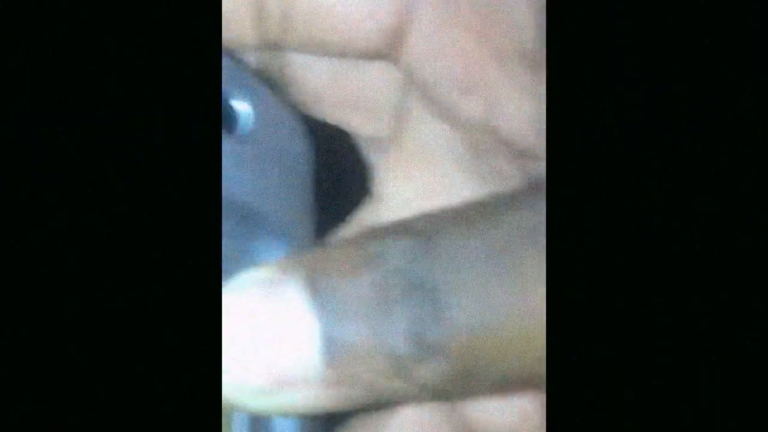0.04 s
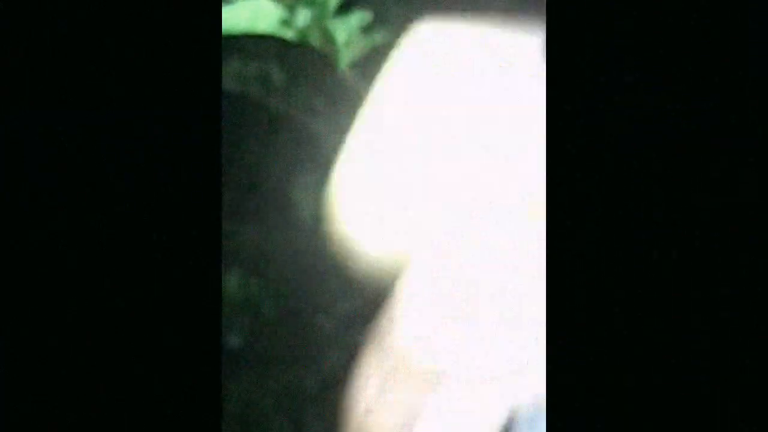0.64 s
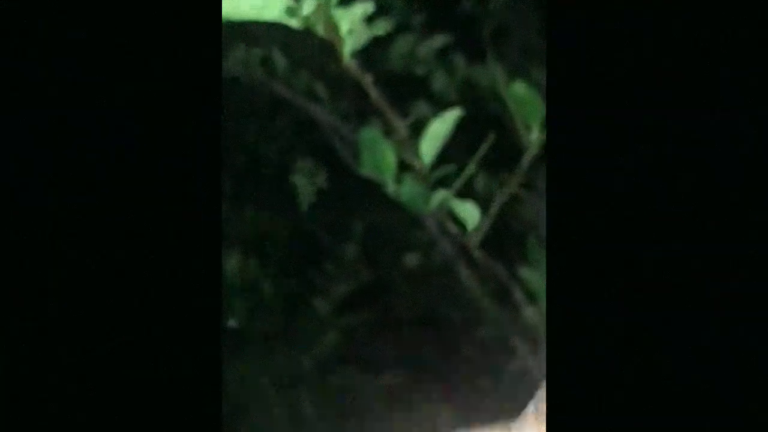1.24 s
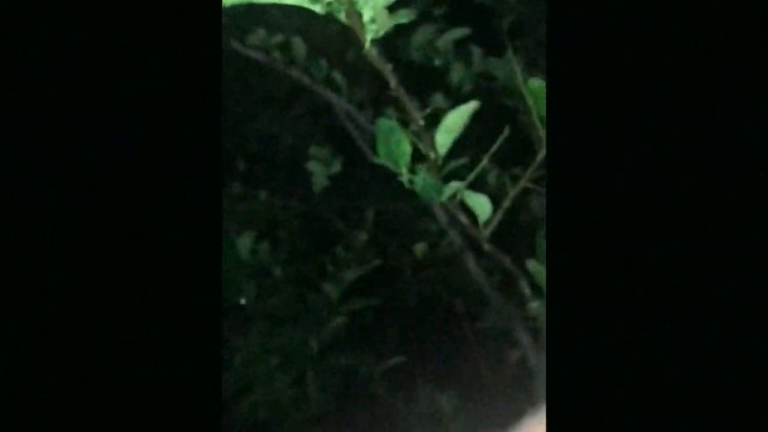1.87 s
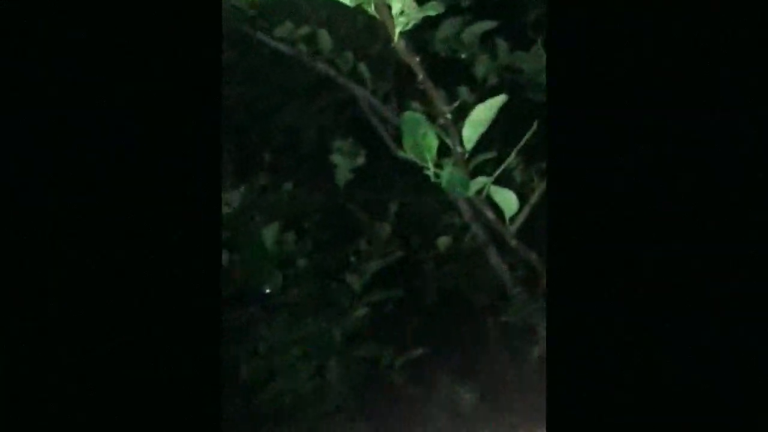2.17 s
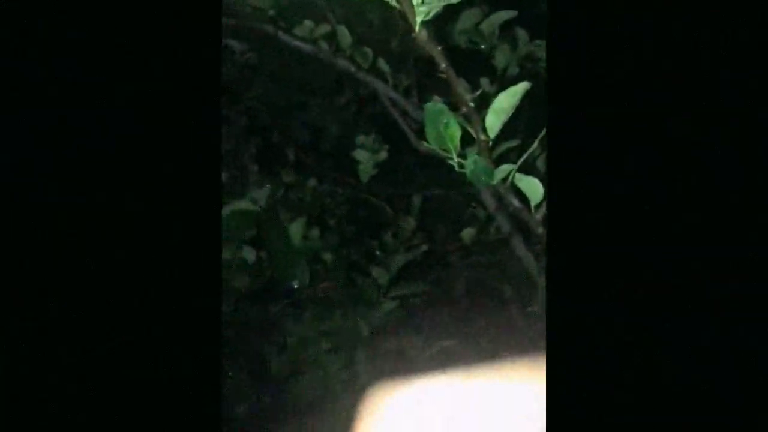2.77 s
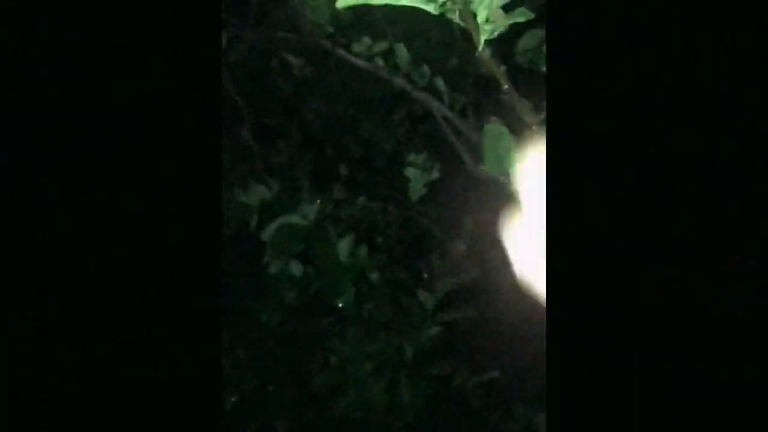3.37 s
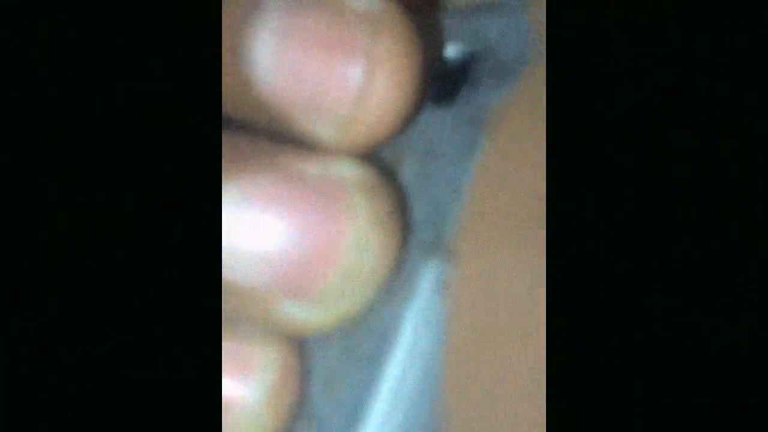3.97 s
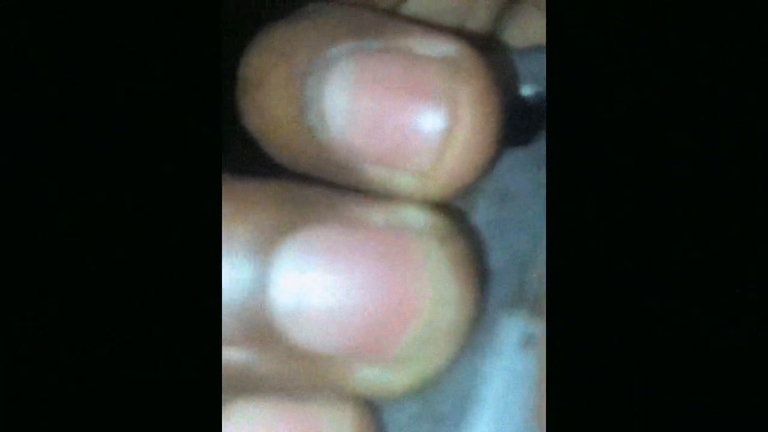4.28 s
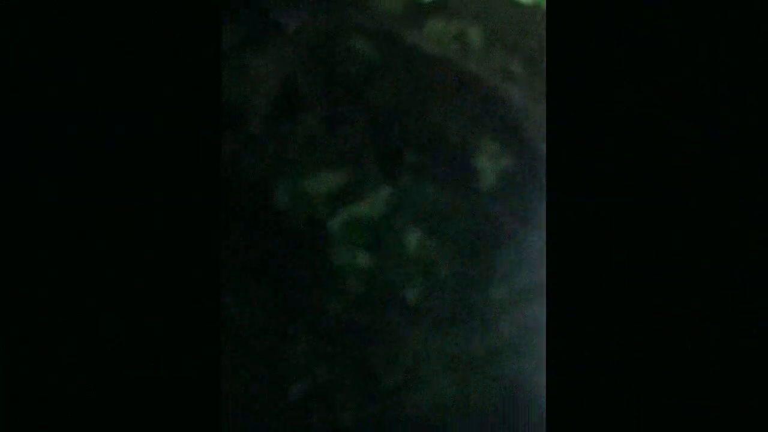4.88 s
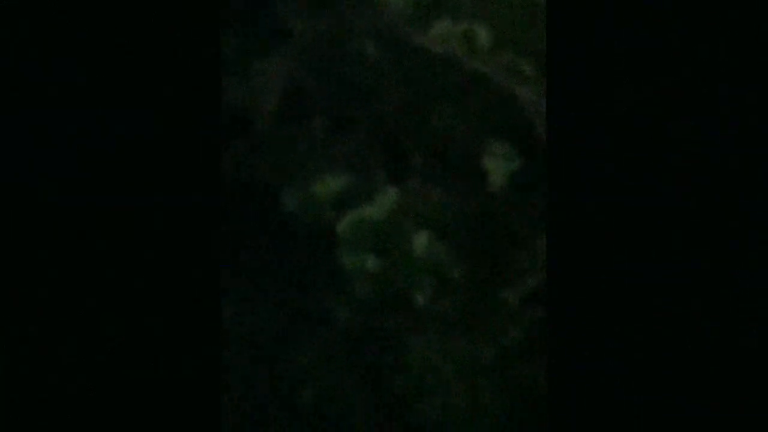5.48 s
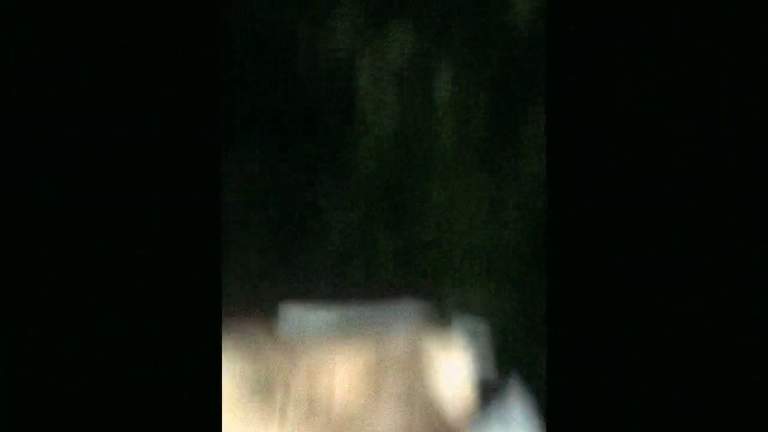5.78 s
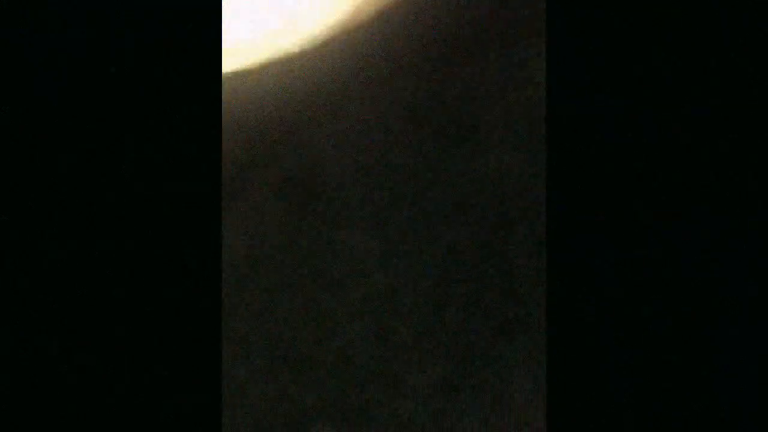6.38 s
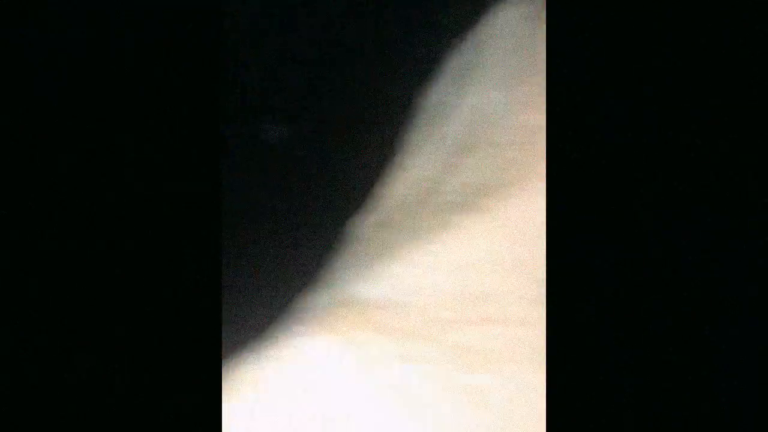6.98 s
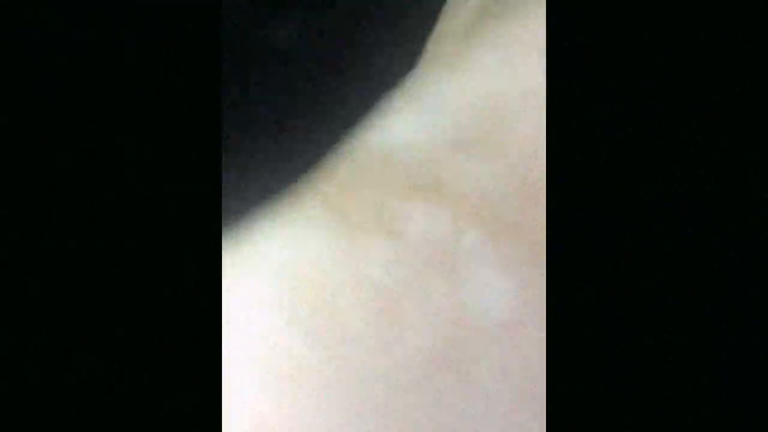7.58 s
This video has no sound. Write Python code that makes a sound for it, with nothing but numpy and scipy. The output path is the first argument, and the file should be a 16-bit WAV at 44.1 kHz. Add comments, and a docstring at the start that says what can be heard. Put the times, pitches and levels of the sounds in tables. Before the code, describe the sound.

Outdoors in bushes at night, a close cricket chirps high and fast, about seven chirps a second, resting briefly around 5 seconds and softening after 7. Behind it, all the way through, frogs call with short low peeps and higher, arching whistled trills, while far insects blend into a thin shimmer over faint night air.

Up front a hand shifts on a hollow plastic torch, with brief skin rubs and small creaks around 0.5 to 0.8, 1.3 and 1.9 seconds, and a louder cluster of creaks at 3.2. Light finger taps follow at about 4.3 and 4.5 seconds, with a few more later. The switch snaps sharply twice, at 5.6 and 6.1 seconds. The holding hand adds a faint low rumble and soft bumps on the microphone, mostly from 4 seconds on, with the strongest thump at 7.3. The chorus continues until the end, near 7.7 seconds.

```python
"""In the bushes at night, a close cricket chirps in falling wing strokes. Behind it two kinds of frog
call, in low peeps and higher arching trills, and far insects merge into a shimmer over the night air.
Up front a hand shifts its grip on a plastic torch: skin rubs and taps, the hollow case creaks,
the switch spring clicks twice, and the hand rumbles and bumps on the camera."""
import sys
import numpy as np
from scipy import signal
from scipy.fft import rfft, irfft, next_fast_len
from scipy.io import wavfile
from scipy.ndimage import map_coordinates

SR = 44100
rng = np.random.default_rng(int(sys.argv[2]) if len(sys.argv) > 2 else 0)


def digitize_waveform(pressure):
    """Quantize a signal to 16-bit integers and store it at the path in sys.argv[1].

    Rows of a 2-D input are taken as channels; values are limited to [-1, 1].
    """
    field = np.atleast_2d(pressure).T
    bounded = np.clip(field, -1, 1)
    quanta = np.round(bounded * 32767).astype(np.int16)
    wavfile.write(sys.argv[1], SR, quanta)


N = 340893

# Levels in the tables are relative; each layer adds its own trim.
# fader rides of the night bed: t/s, air level/dB, insect level/dB, hiss level/dB
BED_RIDES = [(0, -60.5, -59, -89), (1.5, -59, -57, -82), (2.7, -61, -58.5, -78), (4.2, -59.5, -60.5, -88),
             (5.1, -61, -61, -71), (5.9, -61.5, -57.5, -65.5), (6.7, -63, -58.5, -68),
             (7.73, -67.5, -58, -67.5)]
# tone colours of night air, far insects, far trills, far peeps and hiss: f/Hz, level/dB
AIR_EQ = [(15, -28), (35, -6.5), (60, 1.5), (100, -6.5), (200, -4.5), (400, -9), (650, -8.5), (1200, -19),
          (1700, -25.5), (2700, -25.5), (4500, -25.5), (10500, -41.5), (13000, -25.5), (15800, -35)]
INSECT_EQ = [(1200, -18.5), (1700, -22.5), (2700, -23.5), (3200, -19), (4200, -10.5), (4600, -12),
             (5050, -18.5), (5550, -6), (5850, -12), (6300, -3.5), (6650, 1.5), (7000, -0.5), (7300, -3),
             (7600, -18.5), (8200, -32.5)]
FAR_TRILL_EQ = [(2900, -40), (3300, -12.5), (3500, -4), (3720, -1), (3950, -1), (4100, -9), (4400, -34),
                (4800, -86)]
FAR_PEEP_EQ = [(1700, -42), (1860, -11.5), (1950, 0.5), (2060, 1.5), (2150, -6), (2300, -18), (2600, -51),
               (3000, -72)]
HISS_EQ = [(3000, -26), (10500, -7), (13000, 6), (15800, -3)]
# fader ride of the hand's rumble on the camera: t/s, level/dB
RUMBLE_RIDE = [(0, -68), (1.6, -85), (2.2, -60), (3.1, -77), (3.7, -61), (4.15, -57), (5.3, -56.5),
               (5.8, -75), (6.1, -58), (6.9, -54), (7.73, -54)]
# tone colour of that rumble: f/Hz, level/dB
RUMBLE_EQ = [(15, -48), (40, -13), (72, -4), (110, -9), (200, -14.5), (500, -23), (1000, -70)]
# soft bumps on the camera: t/s, f/Hz, peak level/dB, half-width/s
CAMERA_BUMPS = [(3.004, 132, -47, 0.0035), (4.18, 81.5, -45, 0.036), (5.162, 83, -42, 0.021),
                (5.512, 72, -39, 0.011), (6.985, 360, -40.5, 0.0052), (7.286, 55, -21.5, 0.0091)]
# bouts of the peeping frogs: first t/s, period/s, calls, final f/Hz, first level/dB, swell per call/dB
PEEP_BOUTS = [(.235, .925, 4, 2036, -49.5, -1.1), (.083, 1.275, 3, 2058, -52, 1.5),
              (.59, .9, 2, 2030, -52.5, -1), (3.48, .82, 3, 2030, -53, 0.6),
              (4.56, .835, 4, 2050, -52, -0.6), (.22, 1.035, 5, 1990, -52, -0.4),
              (4.02, 1.62, 3, 2020, -50.5, -2)]
# the close cricket's runs of evenly spaced chirps, some following straight on from the one before: first t/s,
# period/s, chirps
CRICKET_RUNS = [(.1422, .143, 5), (.8693, .1503, 4), (1.457, .1415, 3), (1.886, .1447, 4),
                (2.451, .1455, 4), (3.046, .146, 2), (3.3615, .1455, 4), (3.9605, .158, 3),
                (4.4275, .1425, 3), (5.3506, .1596, 4), (5.9797, .154, 3), (6.4656, .1486, 7),
                (7.526, .157, 2)]
# fader ride of the close cricket: t/s, level/dB
CRICKET_RIDE = [(0.15, -31.5), (.57, -34), (2.15, -34), (2.35, -31), (2.8, -34.5), (3.1, -33),
                (3.62, -35.5), (3.92, -29), (4.5, -35), (4.72, -30.5), (5.35, -34), (6.08, -31), (6.3, -37),
                (6.95, -33), (7.35, -41), (7.7, -39)]
# bouts of the trilling frogs: first t/s, period/s, calls, crest f/Hz, first level/dB, swell per call/dB
TRILL_BOUTS = [(.375, .915, 4, 3792, -44.5, -0.56), (4.55, .89, 4, 3800, -47, -0.95),
               (.12, 1.02, 2, 3742, -47.5, -5.5), (2.32, 1.04, 3, 3732, -46, -1.5),
               (4.62, 1.14, 3, 3738, -49, 2.5), (.7, .965, 4, 3900, -49.2, 0.76),
               (4.66, 1, 3, 3906, -49.5, 1.8), (.18, .98, 3, 3922, -44.5, -7.5),
               (4.13, 1.08, 2, 3910, -51, 3.5), (6.55, .8, 2, 3900, -41, -6.5),
               (.38, 1.09, 4, 4036, -50, -1), (4.9, 1.225, 3, 4038, -55.5, 1.5),
               (.53, .895, 6, 3545, -56.5, 1), (6.56, .81, 2, 3540, -44.5, -7.5),
               (5.32, .88, 3, 3712, -49.5, -.5), (1.6, .93, 2, 3900, -50.5, 0.5),
               (5.76, 1, 1, 3824, -47, 0), (6.04, 1, 1, 3636, -50, 0)]
# skin sliding over the torch: middle t/s, length/s, hiss level/dB, case level/dB
SKIN_RUBS = [(.262, .07, -53.5, -52), (.553, .09, -43, -45), (.692, .066, -56, -63), (.813, .1, -57, -54.5),
             (1.125, .035, -62, -57), (1.25, 1.07, -66, -68.5), (1.78, 0.076, -60, -56),
             (1.802, .024, -46, -65), (3.044, .041, -58, -64), (3.174, .035, -50, -34),
             (3.241, 0.094, -53.5, -51.5), (3.505, .09, -56.5, -62), (3.6, 0.64, -63.5, -65),
             (3.8, 0.073, -51.5, -56), (3.99, 0.063, -74, -53), (4.48, .1, -62, -58.5),
             (5.5, 0.061, -56, -62), (5.884, .052, -61, -77), (6.99, 0.12, -62.5, -64),
             (7.3, 0.36, -67.5, -69)]
# modes of the hollow torch case: f/Hz, bandwidth/Hz, level/dB
CASE_MODES = [(1412, 35, -3), (1535, 45, -1), (1602, 40, 0), (1662, 45, -1), (1780, 40, -2),
              (2330, 260, -13)]
# the grip slips and the case creaks: t/s, level/dB
GRIP_SLIPS = [(.545, -23.5), (.631, -30), (.788, -31), (.798, -34), (1.292, -31.5), (1.904, -34),
              (1.929, -28.5), (1.936, -31), (3.167, -16), (3.169, -13), (3.182, -14.5)]
# fingers tap the case: t/s, level/dB
FINGER_TAPS = [(3.002, -49), (4.337, -41.5), (4.522, -43), (5.641, -43.5), (5.857, -41), (5.942, -57),
               (7.338, -44.5)]
# tone colours of sliding skin and of a tap: f/Hz, level/dB
SKIN_EQ = [(200, -16), (900, -0.5), (2500, 9.5), (5500, 8.5), (8000, 11.5), (10500, 2.5), (13000, 6.5),
           (15300, 6.5), (16000, 14.5)]
TAP_EQ = [(150, -10), (500, -1), (1000, -5), (1400, 1), (2000, -16), (2900, -2.5), (5000, -13),
          (15000, -28.5)]
# cues of the nearest peeping frog, slowly quickening: t/s
NEAR_PEEP_CUES = [.423, 1.353, 2.273, 3.133, 4.013, 4.873, 5.663, 6.443, 7.263]
# clicks of the switch: t/s, snap level/dB, case level/dB
SWITCH_CLICKS = [(5.6255, -15, -24), (6.1328, -15, -27)]
# modes of the switch spring: f/Hz, level/dB, t60/s
SPRING_MODES = [(4470, 1.5, 0.0011), (9000, -11, 0.00057), (14300, -7, 0.0012)]


def amp(db):
    return 10 ** (np.asarray(db) / 20)


def unit(x):
    return x / np.sqrt(np.mean(x ** 2) + 1e-20)


def clock(length):
    """Sample times of a short sound."""
    return np.arange(int(length * SR)) / SR


def add(track, s, sound):
    """Mix a sound into the track from time s."""
    i = int(round(s * SR))
    part = sound[max(-i, 0):max(N - i, 0)]
    track[max(i, 0):max(i, 0) + len(part)] += part


def curves(rows):
    """One fader curve for each column after the time."""
    times, *columns = np.transpose(rows)
    return [np.interp(np.arange(N) / SR, times, column) for column in columns]


def wobble(rate, size=N):
    """A smooth random curve, rate knots a second."""
    return map_coordinates(rng.standard_normal(4096), [np.arange(size) * rate / SR], mode="wrap")


def filtered(x, response):
    """Filter x by a complex response of frequency."""
    size = next_fast_len(N + SR // 2)
    return irfft(rfft(x, size) * response(np.fft.rfftfreq(size, 1 / SR)), size)[:N]


def noise(eq):
    """Noise of rms 1 coloured by an EQ curve."""
    f, db = np.transpose(eq)
    white = rng.standard_normal(N)
    return unit(filtered(white, lambda hz: amp(np.interp(np.log(hz + 1), np.log(f), db))))


def phase_of(hz):
    """Running phase of a moving pitch, from a random start."""
    return 2 * np.pi * (np.cumsum(hz) / SR + rng.random())


def gate(t, length, attack, release):
    """Smooth fade in, hold and fade out."""
    fade_in = np.sin(np.pi / 2 * np.clip(t / attack, 0, 1)) ** 2
    fade_out = np.sin(np.pi / 2 * np.clip((length - t) / release, 0, 1)) ** 2
    return fade_in * fade_out


def beats(first, period, count):
    """Cues of an evenly repeated call."""
    return first + period * np.arange(round(count))


def foliage(sound, wet_db, t60):
    """Leaves and ground scatter each call along its own paths, leaving a short reverb tail."""
    t = clock(.3)
    tail = rng.standard_normal(len(t)) * amp(-60 * t / t60) * (t > .002)
    response = amp(wet_db) * tail / np.linalg.norm(tail)
    response[0] = 1  # the direct sound
    return signal.fftconvolve(sound, response)


def night_bed():
    """Distant frogs and insects merge into narrow bands over the night air and a faint hiss."""
    air_db, insect_db, hiss_db = curves(BED_RIDES)
    air = amp(air_db + 2.5) * noise(AIR_EQ)
    insects = amp(insect_db + 5 + 1.6 * wobble(70) + .93 * wobble(6)) * noise(INSECT_EQ)
    trills = amp(-55 + 1.5 * wobble(4)) * noise(FAR_TRILL_EQ)
    peeps = amp(-57 + 3.2 * wobble(8.2)) * noise(FAR_PEEP_EQ)
    hiss = amp(hiss_db - 1) * noise(HISS_EQ)
    return air + insects + trills + peeps + hiss


def hand_on_camera():
    """The holding hand rumbles and bumps the camera softly."""
    out = amp(curves(RUMBLE_RIDE)[0] + .5) * noise(RUMBLE_EQ)
    t = clock(.2) - .1
    for s, hz, db, half_width in CAMERA_BUMPS:
        envelope = np.exp(-np.abs(t / half_width) ** .87)
        add(out, s + t[0], amp(db) * envelope * np.cos(2 * np.pi * hz * t))
    return out


def far_crickets(count=62, length=.41):
    """Single far insects stand out of the shimmer as thin held tones, loudest where it is strongest."""
    out, t = np.zeros(N), clock(length)
    for s, hz in rng.uniform([-.3, 5150], [N / SR, 7350], (count, 2)):
        tone = np.sin(phase_of(hz + 14 * wobble(40, len(t)))) * gate(t, length, .1, .15)
        level_db = -60 + .55 * np.interp(hz, *np.transpose(INSECT_EQ))
        add(out, s, amp(level_db) * tone)
    return out


def peep(end_hz, length=.0905, fall_hz=56):
    """A frog's short whistle starts abruptly and sinks to its final pitch."""
    t = clock(length)
    progress = t / length
    pitch = end_hz + fall_hz * (1 - progress) ** 2
    envelope = gate(t, length, .008, .012) * amp(-2 * (progress - .5))
    flutter = 1 + .15 * wobble(200, len(t))
    return foliage(np.sqrt(2) * envelope * flutter * np.sin(phase_of(pitch)), wet_db=-13, t60=.25)


def frog_chorus(call, bouts, trim_db, stray_hz, crowd_hz, spread_hz, crowd_db, crowd_calls):
    """Nearer frogs keep their own pace, swelling or tiring; a farther crowd joins at random moments."""
    out = np.zeros(N)
    for first, period, calls, hz, db, swell_db in bouts:
        for k, s in enumerate(beats(first, period, calls)):
            add(out, s - .008, amp(trim_db + db + swell_db * k) * call(hz + stray_hz * rng.normal()))
    for k, (nudge, detune, accent) in enumerate(rng.uniform(-1, 1, (crowd_calls, 3))):
        s = (k + nudge) / crowd_calls * N / SR
        level_db = crowd_db + 2 * accent - 5 * detune ** 2
        add(out, s, amp(level_db) * call(crowd_hz + spread_hz * detune))
    return out


def wing_stroke(start_hz, fall_hz, length, fade_db, overtone_db=-39):
    """One wing closure: the scraper slows along the file, so the tone sinks and fades."""
    t = clock(length)
    progress = t / length
    phase = phase_of(start_hz + rng.normal(0, 34) - fall_hz * progress ** 1.72)
    envelope = gate(t, length, .0035, .002) * amp(-fade_db * progress ** 2)
    tone = np.sin(phase) + amp(overtone_db) * np.sin(2 * phase)
    return np.sqrt(2) * envelope / envelope.max() * tone


def close_cricket(trim_db=.74, lead_db=-14.5, middle_db=-2.5, scatter_db=.65):
    """Each chirp is a faint lead-in stroke and two full ones; the last falls on the beat."""
    out = np.zeros(N)
    for s in np.concatenate([beats(*run) for run in CRICKET_RUNS]):
        lead, middle, last = amp(rng.normal([lead_db, middle_db, 0], scatter_db))
        chirp = np.zeros(SR // 10)
        add(chirp, 0, lead * wing_stroke(start_hz=6255, fall_hz=388, length=.0073, fade_db=3))
        add(chirp, .0155, middle * wing_stroke(start_hz=6740, fall_hz=840, length=.01235, fade_db=16))
        add(chirp, .0365, last * wing_stroke(start_hz=6787, fall_hz=966, length=.014, fade_db=17.5))
        level_db = trim_db + np.interp(s, *np.transpose(CRICKET_RIDE))
        add(out, s - .042, amp(level_db) * foliage(chirp, wet_db=-10, t60=.082))
    return out


def trill(crest_hz, length=.169, throb_hz=145):
    """A frog's lightly throbbing whistle climbs, crests and sags; no two arches are alike."""
    t = clock(length)
    progress = t / length
    crest_at, bend = rng.uniform([.45, .7], [.72, 1.4])
    sag_hz = 135 * bend * (1.2 * (progress - crest_at)) ** 2
    pitch = crest_hz - sag_hz + 4 * wobble(35, len(t))
    pace = 1 + .15 * rng.normal() - .25 * progress  # the throb slows through the call
    throb = 1 + .2 * np.sin(phase_of(throb_hz * pace))
    envelope = gate(t, length, .012, .025) * amp(-10 * (progress - .6) ** 2)
    return foliage(np.sqrt(2) * envelope * throb * np.sin(phase_of(pitch)), wet_db=-11.5, t60=.3)


def finger_brushes(count=7, length=.058, hiss_db=-68, case_db=-68):
    """Faint touches of the fingers at random moments, as rows like those of SKIN_RUBS."""
    return [(s, length, hiss_db, case_db) for s in rng.random(count) * N / SR]


def case_ring():
    """Noise of rms 1 ringing in the modes of the hollow plastic case."""
    def response(f):
        return sum((-1) ** k * amp(db) * 1j * f * width / (hz * hz - f * f + 1j * f * width)
                   for k, (hz, width, db) in enumerate(CASE_MODES))
    return unit(filtered(rng.standard_normal(N), response))


def torch_handling(hiss_trim_db=5, case_trim_db=-1, creak_trim_db=2, tap_trim_db=1):
    """Sliding skin hisses and stirs the case; slips make it creak, fingertips tap it."""
    slide, case_drive, tap_drive, creaks = np.zeros((4, N))
    for s, length, hiss_db, case_db in list(SKIN_RUBS) + finger_brushes():
        swell = np.exp(-np.abs(2 * clock(2 * length) / length - 2) ** 3)
        add(slide, s - length, amp(hiss_db) * swell)
        add(case_drive, s - length, amp(case_db) * swell)
    t = clock(.05)
    creak_envelope = gate(t, .05, .0035, .01) * amp(-60 * t / .029)
    for s, db in GRIP_SLIPS:
        ring = sum(amp(mode_db) * np.sin(2 * np.pi * rng.normal(hz, width / 2) * (t - .002))
                   for hz, width, mode_db in CASE_MODES)
        add(creaks, s - .001, amp(db) * creak_envelope * ring / np.abs(ring).max())
        add(slide, s, amp(db - 17 - 60 * t / .0071))  # the skin tears free with a short rasp
    tap_envelope = gate(t, .05, .0014, .01) * amp(-60 * t / .083)
    for s, db in FINGER_TAPS:
        add(tap_drive, s - .001, amp(db) * tap_envelope)
    # ridges of skin catch and let go, so the friction comes in uneven grains
    grain = unit(amp(4 * wobble(900) + 2.7 * wobble(130)))
    hiss = amp(hiss_trim_db) * slide * noise(SKIN_EQ)
    case = amp(case_trim_db) * case_drive * case_ring()
    taps = amp(tap_trim_db) * tap_drive * noise(TAP_EQ)
    return grain * (hiss + case) + amp(creak_trim_db) * creaks + taps


def near_frog(end_hz=1928, stray_hz=6, start_db=-41, fade_db_per_s=.53):
    """The nearest peeper repeats one low note, slowly fading."""
    out = np.zeros(N)
    for s in NEAR_PEEP_CUES:
        add(out, s - .002, amp(start_db - fade_db_per_s * s) * peep(end_hz + stray_hz * rng.normal()))
    return out


def torch_switch(body_t60=.015):
    """The spring snaps, then bending waves cross the case, the low ones arriving last."""
    out, t = np.zeros(N), clock(.02)
    for s, snap_db, case_db in SWITCH_CLICKS:
        crack = .2 * rng.standard_normal(len(t)) * amp(-60 * t / .003)
        spring = sum(amp(db - 60 * t / t60) * np.cos(2 * np.pi * hz * t) for hz, db, t60 in SPRING_MODES)
        dive_hz = 590 + 2400 * np.exp(-t / .00088)
        body = np.sin(phase_of(dive_hz)) * amp(-60 * t / body_t60)
        add(out, s, amp(snap_db) * (crack + spring) + amp(case_db) * body)
    return out


def scene():
    """Mono mix: the night chorus with the handling up front."""
    trillers = frog_chorus(trill, TRILL_BOUTS, trim_db=1.5, stray_hz=5.04,
                           crowd_hz=3752, spread_hz=320, crowd_db=-54.5, crowd_calls=120)
    peepers = frog_chorus(peep, PEEP_BOUTS, trim_db=2, stray_hz=16,
                          crowd_hz=2020, spread_hz=95, crowd_db=-52.5, crowd_calls=36)
    chorus = close_cricket() + far_crickets() + trillers + near_frog() + peepers + night_bed()
    return (chorus + torch_handling() + torch_switch() + hand_on_camera())[None]


def record(dry, top_hz=15850):
    """The camera keeps nothing above its band limit."""
    return filtered(dry[0], lambda hz: hz < top_hz)[None]


dry = scene()
out = record(dry)
digitize_waveform(out)
```